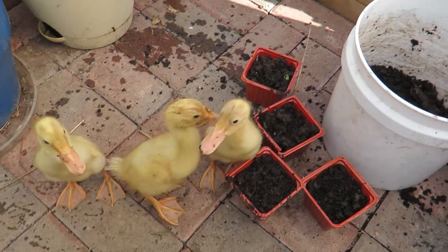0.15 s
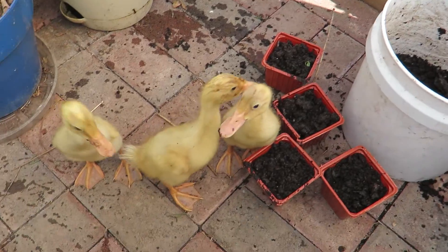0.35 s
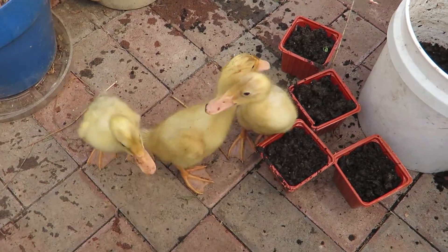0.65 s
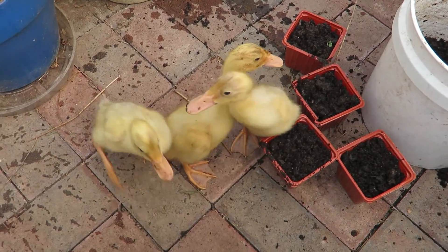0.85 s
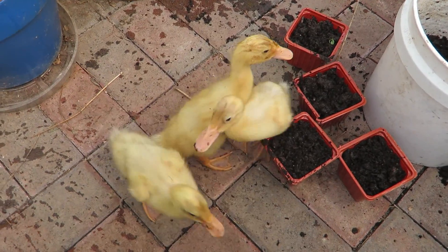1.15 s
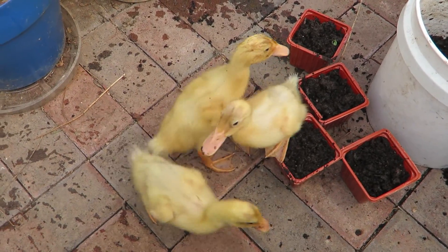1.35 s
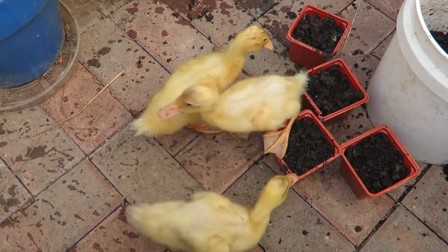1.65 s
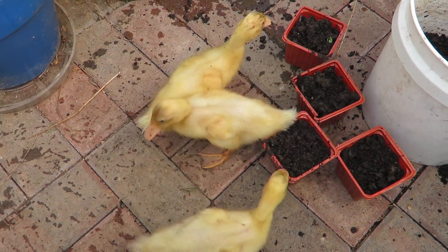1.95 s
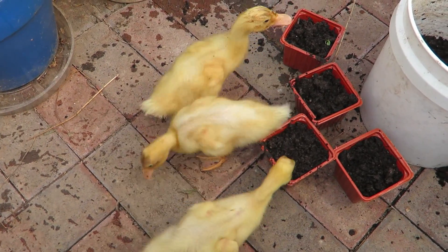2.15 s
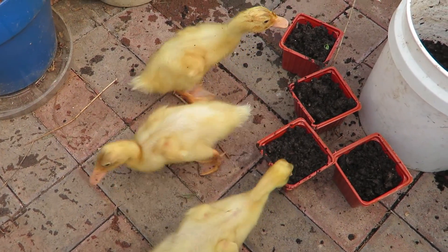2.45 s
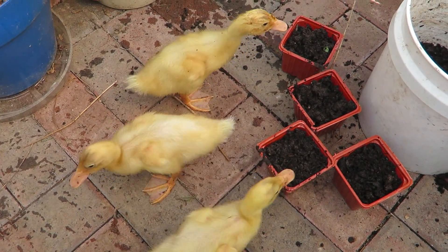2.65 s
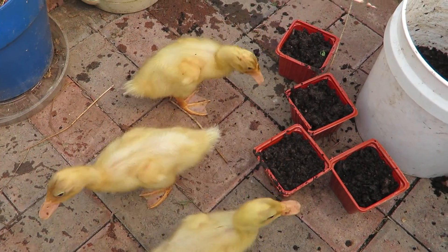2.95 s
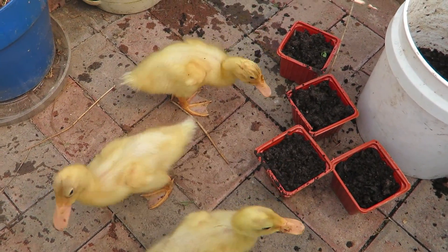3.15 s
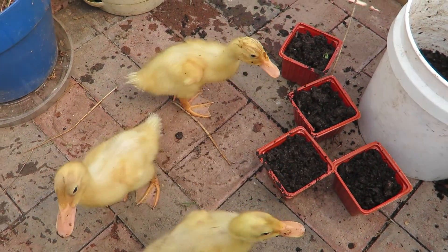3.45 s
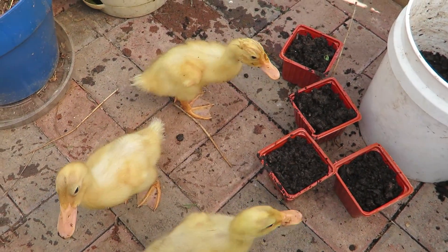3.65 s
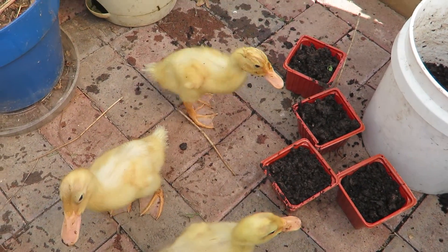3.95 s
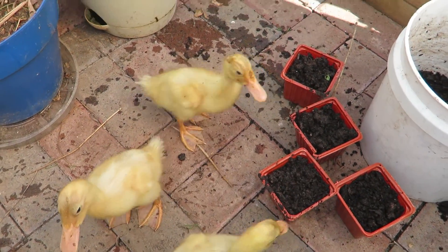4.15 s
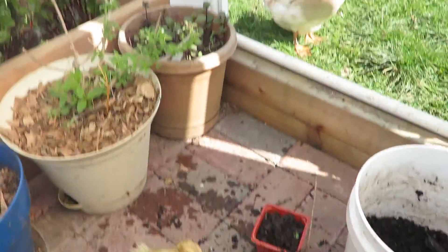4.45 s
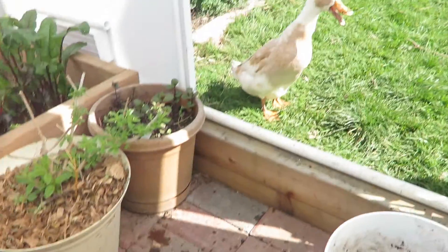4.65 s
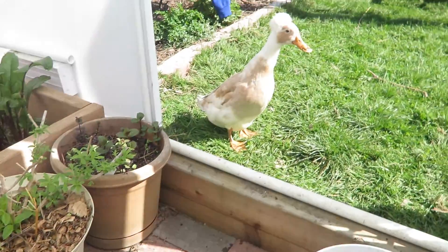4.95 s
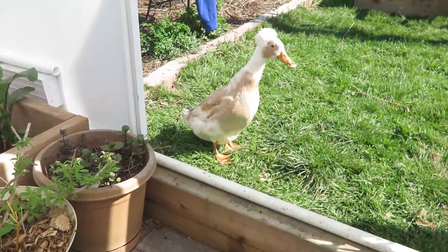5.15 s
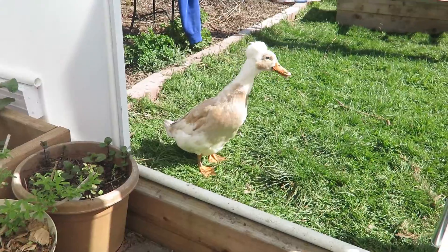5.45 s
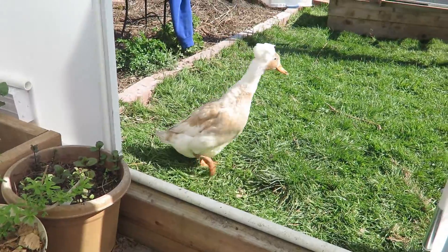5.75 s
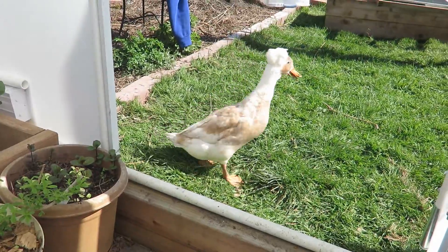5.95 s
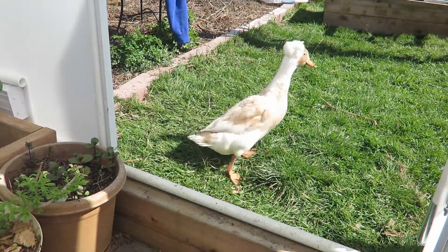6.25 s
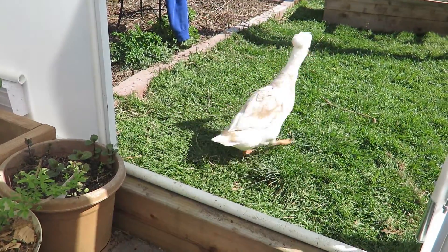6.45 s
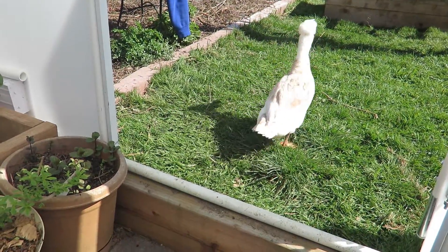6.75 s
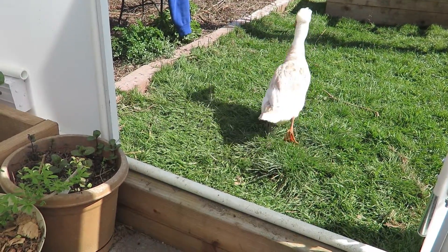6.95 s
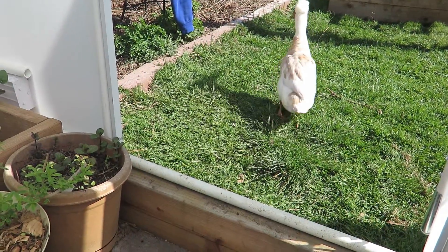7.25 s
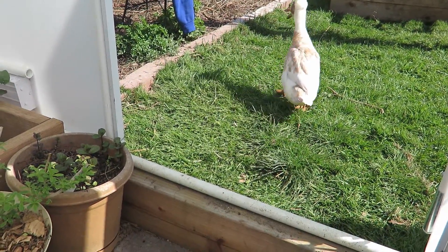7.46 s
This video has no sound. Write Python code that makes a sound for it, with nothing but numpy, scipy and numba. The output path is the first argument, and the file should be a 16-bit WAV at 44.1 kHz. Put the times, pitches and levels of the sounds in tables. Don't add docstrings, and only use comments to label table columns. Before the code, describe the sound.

A duck quacks loudly and steadily outdoors, about every three-quarters of a second, over thin duckling peeps, a pot knock and faint engine drone.

```python
import sys
import numpy as np
from scipy import signal
from scipy.fft import rfft, irfft
from scipy.io import wavfile
from scipy.ndimage import uniform_filter1d
from numba import njit

SR = 44100
rng = np.random.default_rng(int(sys.argv[2]) if len(sys.argv) > 2 else 0)


def natural_amplitude(level_db):
    exponent = np.asarray(level_db, float) / 20
    return 10 ** exponent


def pcm_store(signal):
    levels = np.round(np.clip(np.atleast_2d(signal), -1, 1) * 32767)
    wavfile.write(sys.argv[1], SR, levels.astype(np.int16).T)


N = 335601

# pitch_hz, level_db [dB per Hz]
GARDEN_SPECTRUM = [(18, -47), (35, -17.5), (60, -14), (95, -3.5), (160, -10), (250, -9.5), (500, -18),
                   (900, -17.5), (2300, -27), (4000, -30), (6400, -35.5), (9000, -41.5), (12000, -46),
                   (16000, -61.5)]
# pitch_hz, likeness [0..1]
GARDEN_LIKENESS = [(60, 1), (200, 0.46), (800, 0.17), (3000, 1), (9000, 0.11)]
# pitch_hz, wander [share of pitch], level_db, load_db [dB per unit load]
ENGINE_LINES = [(42.8, 0.042, -60, 3.5), (80, .016, -58.5, -4), (122, 0.011, -65, -2),
                (158, 0.004, -61, 5.5), (238, 0.0056, -76, 6)]
# start_s, nearness_db, load [about -1..1]
ENGINE_COURSE = [(0, 2, -1.5), (1.02, -8, 0.52), (1.4, 2.5, -0.34), (2.5, -3, -.2), (3.2, 6, -0.4),
                 (4.3, 5.5, -.6), (4.9, 2.5, -.1), (5.2, 7.5, .4), (5.75, 2, .1), (6.2, 1.5, 1.1),
                 (7.2, 2, 1.5), (7.61, 6.5, -.4)]
# pitch_hz, t60_s
PATIO_DECAY = [(300, 0.1), (700, 0.086), (1500, 0.19), (4000, 0.18), (10000, 0.027)]
# pitch_hz, side_over_mid_db
PATIO_WIDTH = [(200, -3.5), (700, -31.5), (1500, -21), (4000, -17), (9000, -3.5)]
# start_s, length_s, level_db, low_hz, high_hz
SCUFFS = [
    (.99, .11, -56, 500, 5000),
    (2.17, .1, -53, 2000, 3300),
    (1.42, .045, -61, 2500, 12000),
    (2.24, .06, -60, 500, 1100),
    (1.153, .03, -63, 3500, 9000),
]
# start_s, peak_db, centre_hz,
# t60_s
KNOCKS = [(1.317, -25, 1037, 0.079), (1.323, -14.5, 1296, 0.1), (1.416, -34, 3200, 0.02),
          (1.416, -39, 5400, 0.022), (1.431, -38, 4300, 0.015), (1.979, -49.5, 1800, 0.056),
          (2.256, -48, 900, 0.025), (2.312, -59.5, 1113, 0.043), (2.998, -51.5, 5900, 0.031),
          (3.489, -39.5, 2620, .12), (5.017, -45, 1070, 0.035)]
# start_s, climb_s, crest_hz, note_hz, level_db
PEEPS = [
    (.62, .055, 3700, 2840, -41.5),
    (1.52, .043, 4250, 2880, -40),
    (4.41, 0.04, 3850, 2350, -35),
    (5.238, .045, 3600, 2330, -38.5),
    (6.358, .047, 3980, 2630, -35.5),
    (7.08, .032, 3610, 2583, -37),
    (7.389, 0.027, 3545, 2690, -35.5),
]
# start_s, pitch_hz, level_db
HALF_PEEPS = [
    [(2.148, 1600, -53), (2.16, 2300, -54), (2.195, 3330, -52), (2.235, 3350, -56)],
    [(4.55, 2050, -44.5), (4.58, 2050, -45), (4.59, 1887, -41), (4.603, 1450, -53.5)],
]
# start_s, length_s, level_db, resonance_hz, brightness_db
HOARSE_CALLS = [
    (3.355, 0.09, -32, 1720, -42),
    (3.492, 0.095, -32, 1780, -9),
    (3.667, 0.062, -26.5, 1550, -19),
    (3.705, 0.23, -25.5, 1940, -11.5),
    (4.172, 0.086, -42, 2280, -24),
]
# start_s, length_s, push_db, push_s, held_db [after the push, relative to it]
QUACKS = [(-0.022, 0.21, -11, 0.057, -10.5), (0.695, 0.2, -14.5, .12, -6), (1.614, 0.21, -12, 0.067, -8.5),
          (2.391, 0.21, -15.5, 0.1, -6), (3.092, 0.21, -12, 0.058, -8), (3.872, 0.22, -14, 0.11, -5.5),
          (4.629, 0.21, -15, 0.12, -5), (5.353, 0.21, -15.5, 0.11, -4.5), (6.039, 0.22, -10, 0.046, -12),
          (6.735, 0.22, -13.5, .06, -12), (7.445, 0.18, -17.5, .13, -2.5)]
# top_rate_hz, beak_hz, swell_db [second swell], chest_db, facing_db
HEADS = [(303, 1560, 2.5, -25.5, 1.5), (290.6, 1720, -5.5, -26.5, 0), (295.4, 1720, 2, -27, -1),
         (306, 1620, 3, -27, 0.5), (297, 1620, -6, -26, 1), (290.8, 1720, -6.5, -27.5, -0.5),
         (299.8, 1580, 2.5, -26.5, 2), (298.6, 1400, 13.5, -26, -1), (296.7, 1537, 7, -25.5, -5.5),
         (292, 1555, 10, -28, -8.5), (292.6, 1520, 12.5, -25.5, -6)]
# centre_hz, width_hz, level_db
CHEST_MODES = [(575, 880, -6.5)]
# centre_hz, width_hz, level_db
THROAT_MODES = [(1465, 110, -2)]
# centre_hz, width_hz, level_db
GAPE_MODES = [(2042, 104, 1.5), (2355, 242, -5), (2977, 830, -11.5)]
# centre_hz, width_hz, level_db
RASP_MODES = [(4670, 240, -5.5), (4520, 1600, 24), (5950, 1600, 16.5), (7900, 1200, -28),
              (9500, 500, -22.5), (12000, 3100, -25)]
# start_db, catch_up_s
ONSETS = [(-29, .012), (-14, 0.0095), (-34.5, 0.012), (-20.5, 0.034), (2.5, 0.0067)]

PEEP_START_HZ, PEEP_END_HZ, NOTE_RISE_HZ = 1790, 1550, 200
BREATH_S, FALL_S, DROP_S = 0.113, 0.031, 0.012
START_DB, CLIMB_DB, DROP_DB = -54.5, -56.5, -17.5
RATE_LAG_HZ, RATE_SETTLE_S = 150, 0.035
PUSH_FADE_S, CLOSE_S = 0.0088, 0.0076
SWELL_AT, SWELL_WIDTH = 0.65, 0.081
BEAK_SHUT_HZ, BEAK_OPENS_S = 1400, 0.12
CHEST_HZ, CHEST_RISE_HZ, TURNED_HZ_PER_DB, CHEST_PUSH_DB = 867, 90, 32.5, 10
GAPE_DB, GAPE_FACING, GAPE_CHANGE_DB = -21.5, 0.62, -2.6
RASP_DB, RASP_CHANGE_DB, TONE_DB = -29.5, -5, -31


def rms_one(x):
    return x / np.sqrt(np.mean(x ** 2) + 1e-20)


def evened(x):
    return x / np.sqrt(uniform_filter1d(x ** 2, size=900) + 1e-9)


def in_time(rows):
    s, *columns = np.transpose(rows)
    at = np.arange(max(round(s[0] * SR), 0), min(round(s[-1] * SR), N))
    return at, [np.interp(at / SR, s, column) for column in columns]


def at_hz(points, hz):
    point_hz, value = np.array(points).T
    return np.interp(np.log(hz), np.log(point_hz), value)


def drift(rate_hz, size):
    r = np.exp(-2 * np.pi * rate_hz / SR)
    slow = signal.lfilter([1], [1, -2 * r, r * r], rng.standard_normal(size + 9000))
    return rms_one(slow[9000:])


def fades(size, rise_s, fall_s):
    t = np.arange(size) / SR
    return np.clip(np.minimum(t / rise_s, t[::-1] / fall_s), 0, 1)


def band(x, low_hz, high_hz):
    return signal.sosfilt(signal.butter(2, [low_hz, high_hz], "band", fs=SR, output="sos"), x)


def low_cut(x, hz):
    return signal.sosfilt(signal.butter(2, hz, "high", fs=SR, output="sos"), x)


@njit
def gliding(x, twice_cos, r):
    y = np.zeros(len(x))
    for i in range(2, len(x)):
        y[i] = (1 - r * r) / 2 * (x[i] - x[i - 2]) + r * twice_cos[i] * y[i - 1] - r * r * y[i - 2]
    return y


def resonance(x, hz, width_hz):
    return gliding(x, 2 * np.cos(2 * np.pi * hz / SR) * np.ones(len(x)), np.exp(-np.pi * width_hz / SR))


def modes(x, table):
    return sum((-1) ** k * natural_amplitude(db) * resonance(x, hz, width) for k, (hz, width, db) in enumerate(table))


def patchy(x, table, patchy_db):
    return sum((-1) ** k * natural_amplitude(db + patchy_db * drift(25, size=len(x))) * resonance(x, hz, width)
               for k, (hz, width, db) in enumerate(table))


def summed(parts):
    out = np.zeros(N)
    for at, sound in parts:
        out[at] += sound
    return out


def garden():
    hz = np.fft.rfftfreq(N, 1 / SR) + 1
    alike = np.clip(at_hz(GARDEN_LIKENESS, hz), 0, 1)
    mid, side = rfft(rng.standard_normal((2, N))) * natural_amplitude(at_hz(GARDEN_SPECTRUM, hz))
    both = irfft(np.sqrt(1 + alike) * mid + np.sqrt(1 - alike) * side * [[1], [-1]], N)
    return rms_one(both) * natural_amplitude(-55.5 + 0.38 * drift(2.3, size=N))


def drone():
    at, (near_db, load) = in_time(ENGINE_COURSE)
    out = np.zeros(N)
    for hz, wander, db, load_db in ENGINE_LINES:
        phase = 2 * np.pi * np.cumsum(hz * (1 + wander * drift(0.62, size=len(at)))) / SR
        level_db = db + near_db + load_db * load + 1.1 * drift(5, size=len(at))
        out[at] += np.sqrt(2) * natural_amplitude(level_db) * np.sin(phase)
    return out


def patio(x):
    t = np.arange(SR // 2) / SR
    mid, side = np.zeros((2, len(t)))
    bounds = 150 * 2 ** np.arange(0, 7.1, 0.5)
    for low, high in zip(bounds, bounds[1:]):
        hz = np.sqrt(low * high)
        t60 = at_hz(PATIO_DECAY, hz)
        both = band(rng.standard_normal((2, len(t))), low, high)
        both = both * natural_amplitude(-60 * t / t60) * np.clip(t / 0.0014 - 0.3, 0, 1) / np.sqrt(t60)
        mid = mid + both[0]
        side = side + both[1] * natural_amplitude(at_hz(PATIO_WIDTH, hz))
    echo = np.array([mid + side, mid - side]) / np.sqrt(np.sum(mid ** 2))
    echo = low_cut(echo, 420)
    return signal.fftconvolve(x[None], echo, axes=1)[:, :N]


def scuff(start, length, db, low_hz, high_hz):
    size = round(length * SR)
    air = rng.standard_normal(size) * natural_amplitude(2.8 * drift(120, size=size))
    return round(start * SR) + np.arange(size), natural_amplitude(db) * rms_one(band(air, low_hz, high_hz)) * np.hanning(size)


def knock(start, db, hz, t60):
    t = np.arange(3000) / SR
    burst = rng.standard_normal(len(t)) * (natural_amplitude(-60 * t / t60) + 3 * natural_amplitude(-60 * t / 0.0085))
    hollow = band(resonance(burst, hz, 0.8 * hz), 500, 7000)
    burst = hollow + 0.02 * band(burst, 3000, 12000)
    return round(start * SR) + np.arange(len(t)), natural_amplitude(db) * burst / np.abs(burst).max()


def peep_shape(start, climb_s, crest_hz, note_hz, db):
    top, end = start + climb_s, start + BREATH_S
    return [(start, PEEP_START_HZ, START_DB),
            (start + 0.38 * climb_s, 0.65 * crest_hz, CLIMB_DB),
            (start + 0.59 * climb_s, 0.97 * crest_hz, CLIMB_DB - 0.5),
            (top, crest_hz, CLIMB_DB + 3.5),
            (top + 0.55 * FALL_S, note_hz + 450, db - 4),
            (top + FALL_S, note_hz, db),
            (end, note_hz + NOTE_RISE_HZ, db - 4.5),
            (end + DROP_S, PEEP_END_HZ, db + DROP_DB)]


def peep(rows):
    at, (hz, db) = in_time(rows)
    hz = uniform_filter1d(hz, size=300, mode="nearest")
    faint = np.clip((-44 - db) / 10, 0, 1)
    waver = (0.006 + 0.014 * faint) * drift(150, size=len(at))
    phase = 2 * np.pi * np.cumsum(hz * (1 + waver)) / SR
    tone = np.sin(phase) + natural_amplitude(-34) * np.sin(2 * phase) + natural_amplitude(-45) * np.sin(3 * phase)
    flutter_db = (1.5 + 3 * faint) * drift(60, size=len(at))
    return at, np.sqrt(2) * natural_amplitude(db + flutter_db) * tone * fades(len(at), 0.0024, 0.0019)


def hoarse(start, length, db, hz, bright_db):
    t = np.arange(9000) / SR
    hz = hz + 150 * (t - length / 2) + 45 * drift(30, size=len(t))
    air = rng.standard_normal(len(t)) * natural_amplitude(2.5 * drift(110, size=len(t)))
    core = rms_one(resonance(resonance(air, hz, 160), hz, 600))
    low = rms_one(band(modes(air, [(845, 210, 4), (1490, 150, 5.5)]), 650, 1300))
    top = modes(air, [(2600, 140, 5.0), (3200, 170, 3.5), (3580, 210, -1), (4865, 1200, -17)])
    top = rms_one(band(top, 2000, 5600))
    close = np.clip((length - t) / 0.072, 0, 1)
    core = (core + natural_amplitude(-18) * low) * np.minimum(t / 0.018, 1)
    top = natural_amplitude(bright_db) * top * np.minimum(t / 0.012, 1)
    return round(start * SR) + np.arange(len(t)), natural_amplitude(db - 3) * (core + top) * close


def syrinx(t, length, top_hz):
    size, left_s = len(t), np.maximum(length - t, 0)
    hz = np.minimum(top_hz - RATE_LAG_HZ * np.exp(-t / RATE_SETTLE_S), 135 + 4000 * t)
    hz = hz * (1 - 0.1 * np.exp(-left_s / 0.026))
    rough = 0.16 + 0.75 * np.exp(-t / 0.035) + 0.7 * np.exp(-left_s / 0.018)
    steady = np.cumsum(hz) / SR
    turns = steady + 0.04 * rough * drift(150, size=size)
    whole = np.floor(turns)
    fired = np.flatnonzero(np.diff(np.maximum.accumulate(whole[:-1]), prepend=-2) > 0)
    strength = natural_amplitude(3.5 * rough[fired] * drift(300, size=size)[fired])
    early = np.clip((turns - whole)[fired] * SR / hz[fired], 0, 1)
    pulses = np.full(size, 1e-18)
    pulses[fired] = early * strength
    pulses[fired + 1] += (1 - early) * strength
    puff = rng.standard_normal(size) * np.exp(-2.5 * (turns - whole))
    return pulses, puff, rough, steady


def quack(breath, head):
    start, length, push_db, push_s, held_db = breath
    top_hz, beak_hz, swell_db, chest_db, facing_db = head
    size = 12000
    t = np.arange(size) / SR
    share = np.minimum(t / length, 1)
    pulses, puff, rough, steady = syrinx(t, length, top_hz)
    source = pulses + 0.1 * rough * puff

    beak_hz = beak_hz + (BEAK_SHUT_HZ - beak_hz) * np.exp(-t / BEAK_OPENS_S)
    throat = modes(source, THROAT_MODES) + natural_amplitude(7.0) * resonance(source, beak_hz, 360)
    throat = band(throat, 1293, 2000)
    chest_hz = CHEST_HZ + (CHEST_RISE_HZ - TURNED_HZ_PER_DB * facing_db) * np.sqrt(share)
    chest = modes(pulses, CHEST_MODES) * np.clip(t / 0.02 - 0.7, 0, 1)
    chest = band(chest - resonance(pulses + 0.063 * rough * puff, chest_hz, 280), 330, 1900)
    gape = band(patchy(source + 0.015 * puff, GAPE_MODES, 2.5), 1850, 3500)
    hiss = pulses + 0.14 * puff + 0.015 * rng.standard_normal(size)
    rasp = band(patchy(hiss, RASP_MODES, 1.5), 3300, 9500) * np.clip(t / 0.012, 0.03, 1)
    tone = np.sqrt(2) * np.sin(2 * np.pi * steady) * np.clip(t / 0.012 - 1.4, 0, 1)

    spent = 0.5 + 0.5 * np.tanh((t - push_s) / PUSH_FADE_S)
    swell = np.exp(-((share - SWELL_AT) / SWELL_WIDTH) ** 2)
    levels = [push_db + spent * (held_db + swell_db * swell),
              chest_db + CHEST_PUSH_DB * np.exp(-t / 0.023),
              GAPE_DB + GAPE_FACING * facing_db + GAPE_CHANGE_DB * share,
              RASP_DB + facing_db + RASP_CHANGE_DB * share,
              TONE_DB + 0.31 * facing_db]
    parts = [evened(throat), evened(chest), evened(gape), rms_one(rasp), tone]
    voice = np.zeros(size)
    for db, part, (down_db, lag_s) in zip(levels, parts, ONSETS):
        voice += natural_amplitude(db + down_db * np.exp(-t / lag_s)) * part
    voice = voice * np.clip(np.minimum(t / 0.00023, (length - t) / CLOSE_S), 0, 1)
    at = round(start * SR) + np.arange(size)
    heard = (at >= 0) & (at < N)
    return at[heard], voice[heard]


def scene():
    peeps = summed(map(peep, [peep_shape(*row) for row in PEEPS] + HALF_PEEPS))
    knocks = summed(knock(*row) for row in KNOCKS)
    scuffs = summed(scuff(*row) for row in SCUFFS)
    small = peeps + knocks + scuffs
    other = summed(hoarse(*row) for row in HOARSE_CALLS)
    duck = summed(map(quack, QUACKS, HEADS))
    echo = patio(natural_amplitude(-3.5) * duck + natural_amplitude(-2.5) * small + natural_amplitude(0.5) * other)
    return garden() + drone() + echo + small * natural_amplitude(np.array([[-0.6], [0.6]])) + other + duck


def roll_off(x):
    return signal.sosfilt(signal.butter(12, 15400, fs=SR, output="sos"), x)


def record(dry):
    mix = np.tanh(low_cut(dry, 30))
    return roll_off(mix)


dry = scene()
out = record(dry)
pcm_store(out)
```